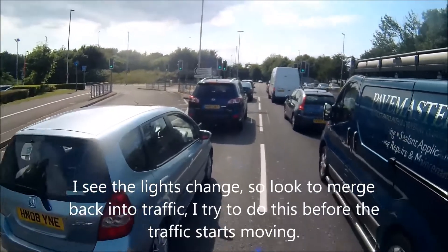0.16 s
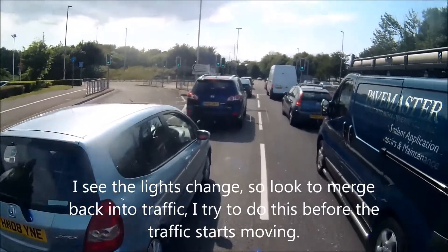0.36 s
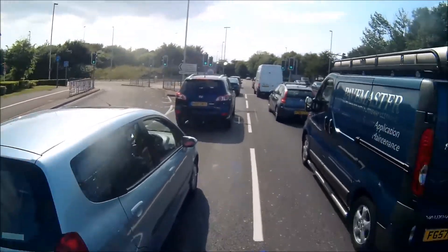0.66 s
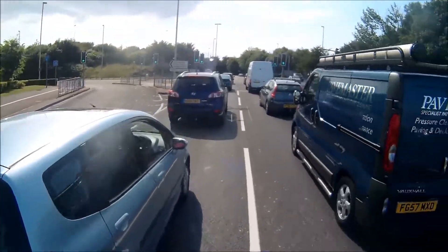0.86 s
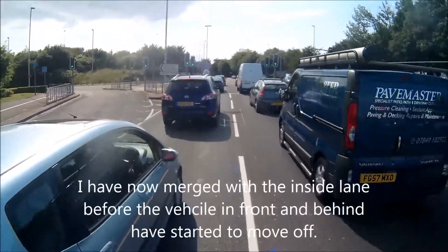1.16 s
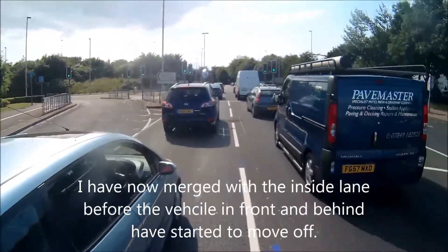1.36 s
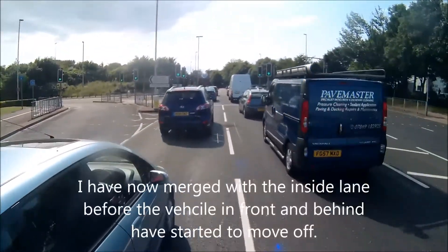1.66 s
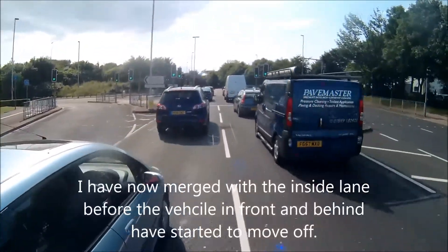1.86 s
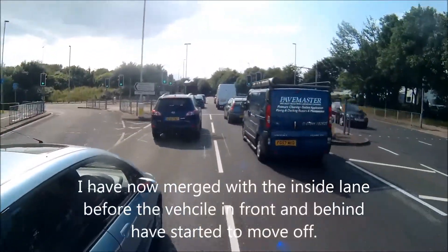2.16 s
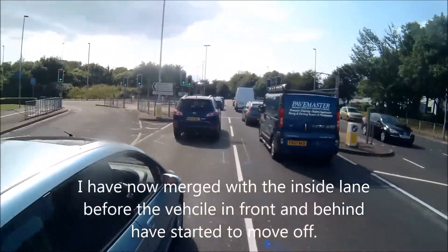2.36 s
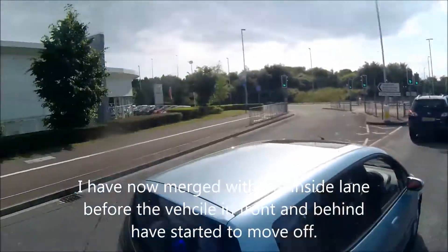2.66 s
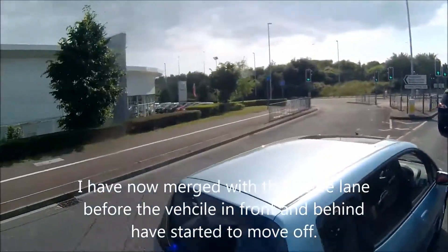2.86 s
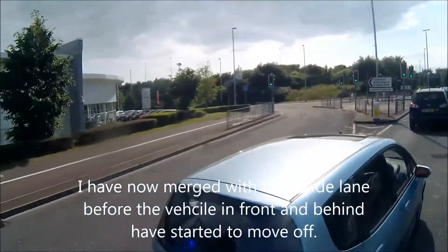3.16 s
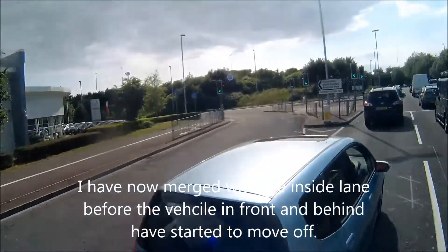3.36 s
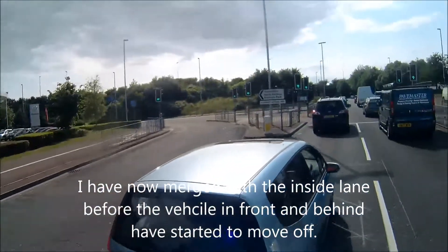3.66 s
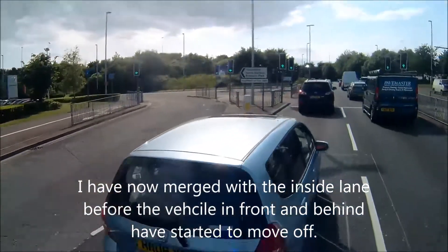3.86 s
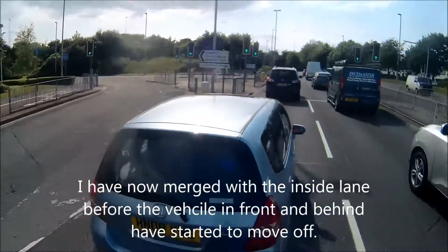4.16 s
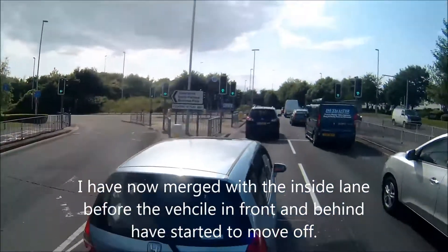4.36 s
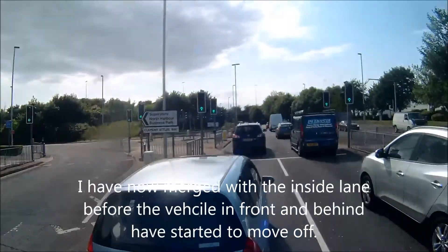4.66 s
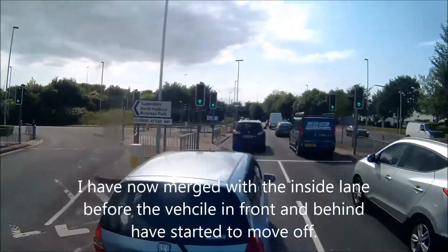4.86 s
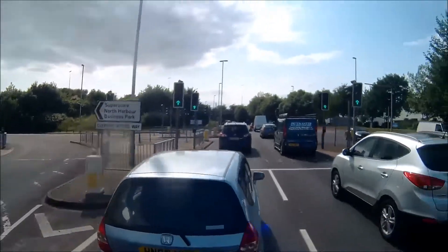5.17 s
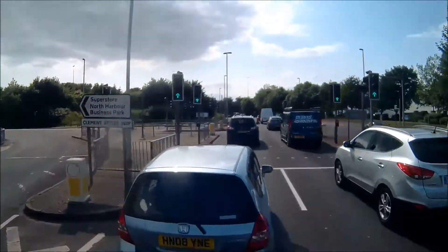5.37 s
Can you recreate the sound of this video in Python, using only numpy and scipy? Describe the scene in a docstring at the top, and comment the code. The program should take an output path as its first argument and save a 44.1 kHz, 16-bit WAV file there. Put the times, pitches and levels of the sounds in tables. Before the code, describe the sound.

A two-tone car horn blasts once for about a second, close by, over droning engines, tyre hiss and wind on the microphone.

```python
"""A two-tone disc horn blasts for a second, close by in slow town traffic. Its two diaphragms hum a
whole tone apart, their armatures strike and ring the tone discs, and the street adds a thin echo.
Underneath, engines drone and pull away, tyres hiss, belts and fans whirr and wind buffets the microphone.
It is all heard from a small camera riding among the cars, which holds each sample at a low rate,
mirroring the horn into the treble, and fizzes when the sound is loud."""
import sys
import numpy as np
from scipy import signal
from scipy.fft import rfft, irfft
from scipy.io import wavfile
from scipy.ndimage import uniform_filter1d

SR = 44100
rng = np.random.default_rng(int(sys.argv[2]) if len(sys.argv) > 2 else 0)


def unload_audio(sound):
    """Save the sound as a 16-bit wav file, at the path given as the first command line argument."""
    columns = np.transpose(np.atleast_2d(sound))
    # keep every value between -1 and 1, then stretch to whole-number steps
    steps = np.round(np.clip(columns, -1, 1) * 32767)
    wavfile.write(sys.argv[1], SR, steps.astype(np.int16))


N = 243431
T = np.arange(N) / SR
HZ = np.fft.rfftfreq(N, 1 / SR)

CURRENT_ON, FIRST_STRIKE, CURRENT_OFF = 4.283, 4.297, 5.232  # horn cues [s]
TURN_AT, TURN_GLIDE = 4.8, 0.082  # car and microphone shift, and the horn's pitch and colour with them [s]

# colour of the wind on the microphone (frequency [Hz], relative level [dB])
WIND_COLOUR = [(15, -6.5), (30, -14), (50, 0), (75, 0.5), (115, -7.5), (200, -8.5), (330, -16),
               (600, -31.5), (1500, -52.5)]
# gusts and lulls (time [s], level change [dB], half-length [s])
WIND_GUSTS = [(.35, 2, 0.27), (2.2, 2, .12), (3.15, 1.5, 0.27), (4.08, 4.5, .15), (4.42, -3.5, 0.086),
              (4.8, 3, 0.14), (5.315, 8.5, 0.046)]
# colour of the bed of tyre noise (frequency [Hz], relative level [dB])
TYRE_BED_COLOUR = [(100, -16), (300, -0.5), (550, 0), (850, 0), (1250, -7), (1700, -10), (2300, -15),
                   (3000, -17.5), (3800, -26.5), (4800, -34), (6000, -42)]
# colour of the roar of close tyres (frequency [Hz], relative level [dB])
CLOSE_TYRE_COLOUR = [(300, -7.5), (650, 0), (900, 0.5), (1150, -6), (1600, -9), (3000, -23), (6000, -48)]
# close tyres swell and pass (time [s], peak level [dB], half-length [s])
TYRE_PASSES = [(2.754, -33, 0.4), (3.623, -37.5, 0.12), (3.954, -33, 0.75)]
# colour of belts and fans (frequency [Hz], relative level [dB])
WHIRR_COLOUR = [(700, -18), (1300, -2.5), (1750, 0.5), (2200, -7.5), (2750, -7.5), (3400, -17), (4400, -22),
                (6000, -30)]
# the whirr swells beside an engine bay (time [s], level change [dB], half-length [s])
ENGINE_BAY_SWELLS = [(1.65, 4, 0.77), (2.9, 4.5, .17), (5.45, 3.5, 0.13)]

# the car alongside gathers speed, then rolls on (time [s], firing rate [Hz])
NEAR_CAR_REVS = [(0.9, 23.1), (1.21, 25.5), (1.59, 42.98), (1.89, 48.56), (3.29, 45.18), (3.88, 41.24),
                 (5.35, 51.18), (5.52, 57.3)]
# its exhaust note (multiple of the firing rate, relative level [dB])
NEAR_CAR_EXHAUST = [(1, 2.5), (2, -7), (3, -7.5), (4, -14)]
# its dabs of throttle (time [s], level change [dB], half-length [s])
NEAR_CAR_THROTTLE = [(1.5, 3.5, 0.12), (2.05, 1.5, .25), (4, 5, 0.1)]
# the van revs up, holds and eases off (time [s], firing rate [Hz])
VAN_REVS = [(.25, 41.62), (1.7, 59.53), (2.85, 89), (3.3, 89.07), (3.75, 81.14), (4.1, 70.1)]
# its exhaust note (multiple of the firing rate, relative level [dB])
VAN_EXHAUST = [(1, 1.5), (2, -19.5), (3, -20)]
# its moments of more or less throttle (time [s], level change [dB], half-length [s])
VAN_PEDAL = [(2.25, 4, 0.12), (3.52, -12.5, 0.12), (3.8, 2.5, 0.13)]
# a car in the queue speeds off (time [s], firing rate [Hz])
QUEUE_CAR_REVS = [(0, 60.9), (1.05, 92.64)]

# the street's echo tail (frequency [Hz], time to fall 60 dB [s])
STREET_DECAY = [(300, 0.72), (1000, 0.36), (3000, 0.45), (6000, 0.26)]
# free ringing of the tone discs (frequency [Hz], width [Hz], level [dB])
DISC_MODES = [(2620, 53, -31.5), (2988, 105, -34), (2890, 48, -32.5)]
# low-horn partials that lie on its tone disc (multiple, level before the turn [dB], level after [dB])
LOW_DISC_PARTIALS = [(7, -16, -15), (8, -16, -21.5)]
# echoes briefly cancel one of those partials (time [s], multiple, depth [dB], half-length [s])
ECHO_DIPS = [(4.323, 7, 7, 0.033), (4.434, 7, 13, 0.025), (4.507, 8, 9.5, 0.054), (4.748, 7, 2, 0.03),
             (4.77, 8, 13, 0.063), (5.017, 7, 8.5, 0.025), (5.124, 8, 6, 0.035), (5.18, 7, 5.5, 0.1)]
# the low horn's weaker partials (multiple, level before the turn [dB], level after [dB])
LOW_OVERTONES = [(2, -50, -58), (3, -59, -62), (4, -48, -45), (5, -44, -67), (6, -32, -38.5),
                 (9, -32.5, -38), (10, -54, -59), (11, -53, -45.5), (13, -54, -55), (14, -50, -52)]
# the high horn's weaker partials (multiple, level before the turn [dB], level after [dB])
HIGH_OVERTONES = [(2, -44, -38), (3, -50, -57), (4, -36, -44.5), (5, -42.5, -42.5), (6, -36, -38),
                  (7, -40, -30.5), (8, -46, -42), (9, -56, -56), (10, -52, -57)]


def gain_of(db):
    """Decibels to a gain factor."""
    return 10 ** (np.asarray(db) / 20)


def unit_rms(x):
    """Scales to an rms of 1."""
    return x / np.sqrt(np.mean(x ** 2) + 1e-20)


def value_at(points, hz):
    """A curve's value at hz, on a log-frequency axis."""
    point_hz, value = np.transpose(points)
    return np.interp(np.log(hz + 1), np.log(point_hz + 1), value)


def wander(rate_hz):
    """Random drift of rms 1, rolled off above rate_hz."""
    return unit_rms(irfft(rfft(rng.standard_normal(N)) / (1 + (HZ / rate_hz) ** 4), N))


def gate(start, stop, rise, fall):
    """Builds from start and dies away from stop, with time constants in seconds."""
    return (1 - np.exp(-np.maximum(T - start, 0) / rise)) * np.exp(-np.maximum(T - stop, 0) / fall)


def swells(rows):
    """A sum of smooth bells, one per row (time [s], height, half-length [s])."""
    return sum(height * np.exp(-((T - at) / half) ** 2) for at, height, half in rows)


def turning(before, after):
    """Glides from one value to the other at the turn."""
    return before + (after - before) * (.5 + .5 * np.tanh((T - TURN_AT) / TURN_GLIDE))


def noise(colour, patchy_db):
    """Coloured noise of rms 1 with patches that drift in time and frequency."""
    hz, _, bands = signal.stft(rng.standard_normal(N), SR, nperseg=2048, noverlap=1536)
    blur = np.outer(np.hanning(20), np.hanning(10))
    patches = unit_rms(signal.fftconvolve(rng.standard_normal(bands.shape), blur, "same"))
    bands = bands * gain_of(value_at(colour, hz)[:, None] + patchy_db * patches)
    return unit_rms(signal.istft(bands, SR, nperseg=2048, noverlap=1536)[1][:N])


def partial(cycles, multiple, db):
    """One harmonic of a vibration, at an rms level and a random phase."""
    return np.sqrt(2) * gain_of(db) * np.sin(2 * np.pi * (round(multiple) * cycles + rng.random()))


def wind(level_db=-30.0, db_per_s=.6, buffet_db=1.0):
    """Lumpy wind buffets the microphone, building as the traffic gathers speed."""
    db = level_db + db_per_s * T + swells(WIND_GUSTS) + buffet_db * wander(37)
    return gain_of(db) * noise(WIND_COLOUR, patchy_db=1.0)


def tyres(bed_db=-34, db_per_s=0.47):
    """A bed of tyre roar grows with the traffic's speed; close tyres swell past on top."""
    bed = gain_of(bed_db + db_per_s * T) * noise(TYRE_BED_COLOUR, patchy_db=1.1)
    passes = swells([(at, gain_of(db), half) for at, db, half in TYRE_PASSES])
    return bed + passes * noise(CLOSE_TYRE_COLOUR, patchy_db=1.4)


def whirr(level_db=-44.5):
    """Belts and fans whirr, louder beside an engine bay."""
    return gain_of(level_db + swells(ENGINE_BAY_SWELLS)) * noise(WHIRR_COLOUR, patchy_db=1.5)


def engine(revs, exhaust, top_revs_db, db_per_octave, uneven_db, jitter=0.0072):
    """An exhaust drones on unsteady multiples of its firing rate; its level is tied to the revs."""
    times, rates = np.transpose(revs)
    firing_hz = np.interp(T, times, rates)
    db = top_revs_db + db_per_octave * np.log2(firing_hz / firing_hz.max())
    cycles = np.cumsum(firing_hz * (1 + jitter * wander(9.8))) / SR
    drone = sum(partial(cycles, k, db + note_db + uneven_db * wander(9.0)) for k, note_db in exhaust)
    return drone * gate(times[0], times[-1], rise=0.022, fall=0.067)


def traffic(near_db=-30, van_db=-25.5, queue_db=-28, leaving_db=-10):
    """The car alongside, a van pulling away and a queueing car whose octave takes over as it leaves."""
    near_level = near_db + swells(NEAR_CAR_THROTTLE)
    near_car = engine(NEAR_CAR_REVS, NEAR_CAR_EXHAUST, near_level, db_per_octave=2.5, uneven_db=2.0)
    van = engine(VAN_REVS, VAN_EXHAUST, van_db + swells(VAN_PEDAL), db_per_octave=7.5, uneven_db=1.1)
    queue_level = queue_db + np.interp(T, [.55, .8], [0, leaving_db])
    queue_exhaust = [(1, 0.014), (2, np.interp(T, [.45, .8], [-16, 2]))]
    queue_car = engine(QUEUE_CAR_REVS, queue_exhaust, queue_level, db_per_octave=-2, uneven_db=2)
    return near_car + van + queue_car


def street_echo(source, wet_db=-16.5, echoes_per_s=1500, predelay_s=.012):
    """Cars and house fronts add a thin tail of echoes, each band dying at its own speed."""
    echoes = rng.standard_normal(SR) * (rng.random(SR) < echoes_per_s / SR) * (T[:SR] > predelay_s)
    hz, age, bands = signal.stft(echoes, SR, nperseg=256)
    decay = gain_of(-60 * age / value_at(STREET_DECAY, hz)[:, None])
    tail = signal.istft(bands * decay, SR, nperseg=256)[1]
    return source + gain_of(wet_db) * signal.fftconvolve(source, tail / np.linalg.norm(tail))[:N]


def diaphragm_hum(low_cycles, high_cycles, waver_db=0.65):
    """The horn's body: each diaphragm hums its fundamental, driven by the current."""
    low_db = turning(-17.5, -19.6) + waver_db * wander(8.6)
    high_db = turning(-23.5, -18.5) + waver_db * wander(8.6)
    low = partial(low_cycles, 1, low_db) * gate(CURRENT_ON, CURRENT_OFF, rise=.003, fall=.03)
    high = partial(high_cycles, 1, high_db) * gate(CURRENT_ON, CURRENT_OFF, rise=.012, fall=.015)
    return low + high


def armature_blare(low_cycles, high_cycles, flutter_db=1.04, throb_depth=0.12):
    """The horn's edge: the armatures' blows stack up harmonics, loudest on the low horn's tone disc."""
    blare = 0
    for k, before_db, after_db in LOW_DISC_PARTIALS:
        dip_db = swells([(at, db, half) for at, which, db, half in ECHO_DIPS if round(which) == round(k)])
        blare += partial(low_cycles, k, turning(before_db, after_db) - dip_db + flutter_db * wander(40))
    for cycles, overtones in [(low_cycles, LOW_OVERTONES), (high_cycles, HIGH_OVERTONES)]:
        for k, before_db, after_db in overtones:
            blare += partial(cycles, k, turning(before_db, after_db) + wander(9.1))
    # the blare throbs at the difference between the two horns' pitches, a fast, rough beat
    return blare * (1 + throb_depth * np.cos(2 * np.pi * (high_cycles - low_cycles)))


def disc_ring(hz, width_hz):
    """A disc mode, struck unevenly, sounds through the blast and rings on briefly; rms 1 while driven."""
    pole = np.exp((-np.pi * width_hz + 2j * np.pi * hz) / SR)
    blows = rng.standard_normal(N) * gate(FIRST_STRIKE, CURRENT_OFF, rise=.002, fall=.024)
    ring = signal.lfilter([1], np.poly([pole, pole]), blows + 1e-18).real
    return ring / np.std(ring[(T > FIRST_STRIKE) & (T < CURRENT_OFF)])


def horn(low_hz=368.3, interval=1.1192, doppler_hz=1.15, jitter=0.0013, sag=0.065,
         bite=0.88, rasp_db=-39.0, rasp_bite=3):
    """Two diaphragms a whole tone apart swing up; their armatures then strike and ring the tone discs."""
    # with the current off, the diaphragms sink toward their slower free swing
    droop = 1 - sag * np.clip((T - CURRENT_OFF - .005) / 0.023, 0, 1)
    pitch_hz = turning(low_hz, low_hz - doppler_hz) * droop
    low_cycles = np.cumsum(pitch_hz * (1 + jitter * wander(71))) / SR
    high_cycles = np.cumsum(pitch_hz * interval * (1 + jitter * wander(70))) / SR
    # the first swings overshoot, giving the attack its bite
    surge = np.exp(-(np.maximum(T - CURRENT_ON, 0) / .028) ** 2)
    hum = diaphragm_hum(low_cycles, high_cycles)
    blare = armature_blare(low_cycles, high_cycles)
    rasp = noise([(300, -11), (2000, -9), (3200, 6), (4200, -0.5), (6000, -9.5)], patchy_db=0.0)
    rasp *= gain_of(rasp_db) * (1 + rasp_bite * surge)
    strikes = (blare + rasp) * gate(FIRST_STRIKE, CURRENT_OFF, rise=.0025, fall=.007)
    clang = sum(gain_of(db) * disc_ring(hz, width_hz) for hz, width_hz, db in DISC_MODES)
    return (hum + strikes) * (1 + bite * surge) + clang


def scene():
    """The horn and its echo over the traffic bed; one microphone feeds both channels."""
    mix = street_echo(horn()) + traffic() + wind() + tyres() + whirr()
    return np.tile(mix, (2, 1))


def record(dry, ceiling=1.06, hold_hz=12000, fizz_db=-15.0, cutoff_hz=15800):
    """The camera's grit: soft overload, a mirror image around the hold rate, fizz, then a band limit."""
    saturated = ceiling * np.tanh(dry / ceiling)
    narrow = irfft(rfft(saturated) * (HZ < hold_hz / 2), N)
    mirrored = narrow * (1 + 2 * np.cos(2 * np.pi * hold_hz * T))
    held = irfft(rfft(mirrored) * np.sinc(HZ / hold_hz), N)  # holding each sample also dulls the top
    # a white fizz rides on the sound, stronger the steeper its waves are
    steepness = np.sqrt(abs(uniform_filter1d(np.gradient(narrow[0]) ** 2, size=180)))
    fizz = gain_of(fizz_db) * steepness * rng.standard_normal(N)
    lowpass = signal.firwin(511, cutoff_hz, window=("kaiser", 9), fs=SR)
    return signal.oaconvolve(held + fizz, lowpass[None], "same")


dry = scene()
out = record(dry)
unload_audio(out)
```